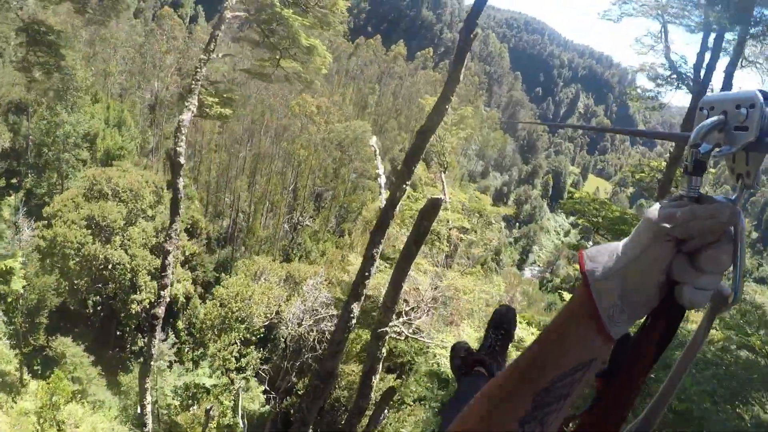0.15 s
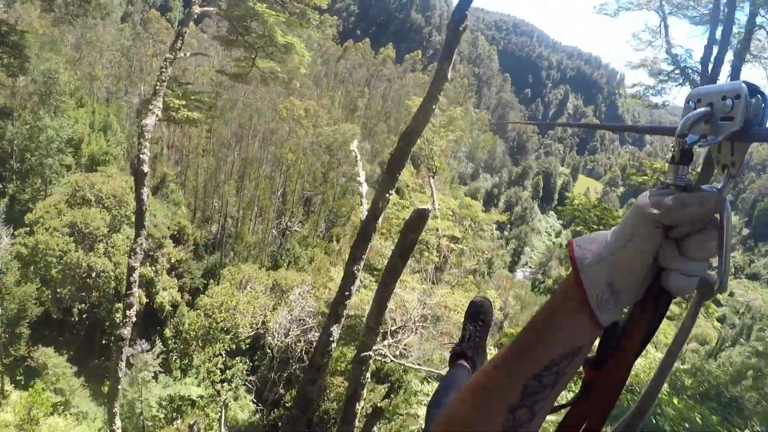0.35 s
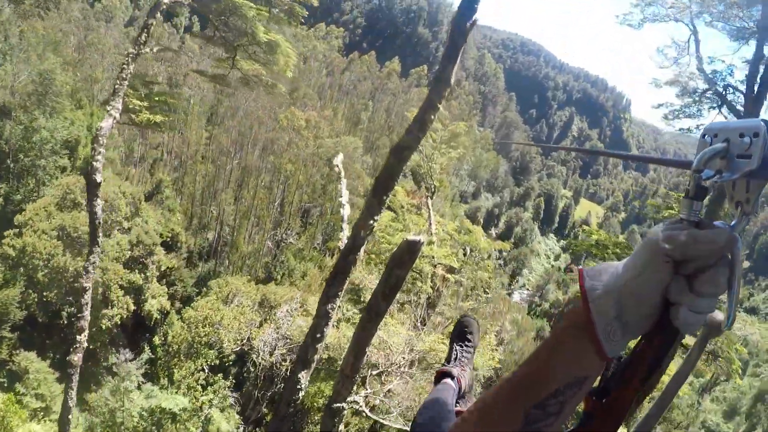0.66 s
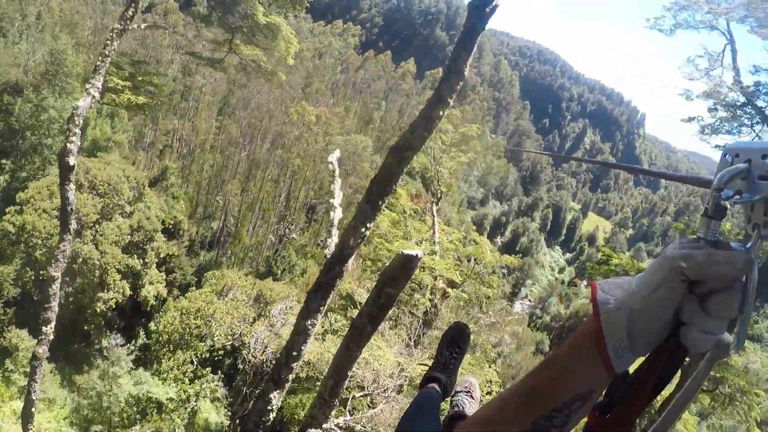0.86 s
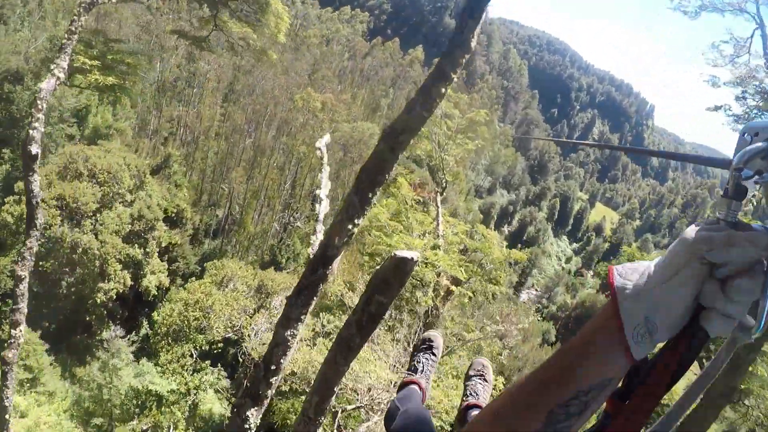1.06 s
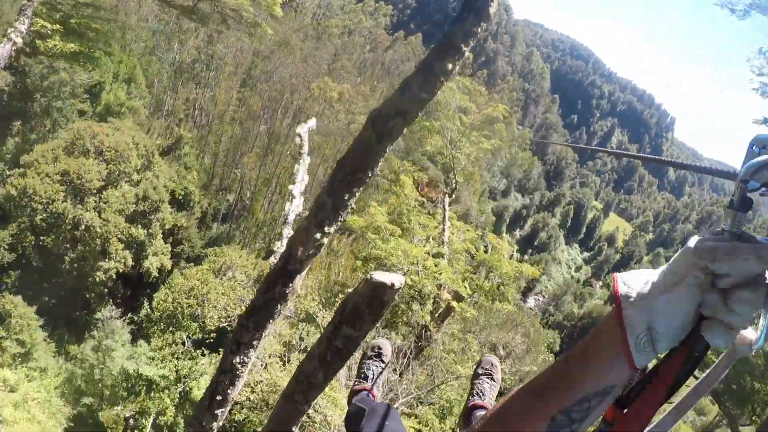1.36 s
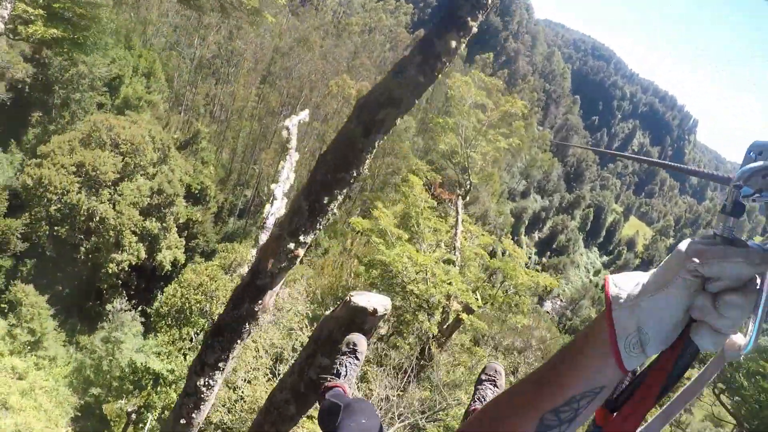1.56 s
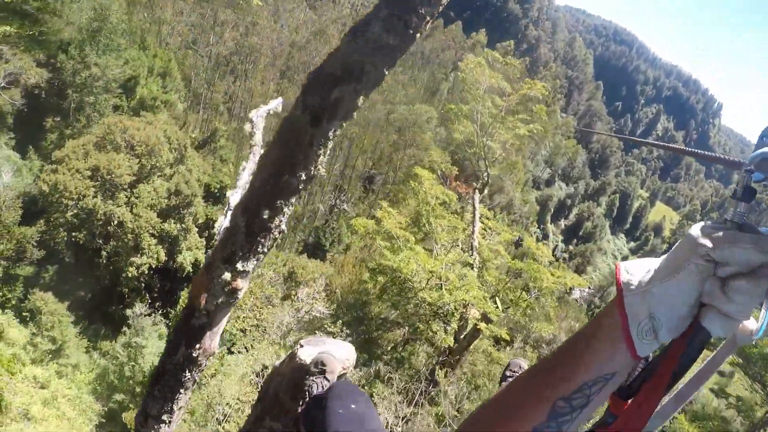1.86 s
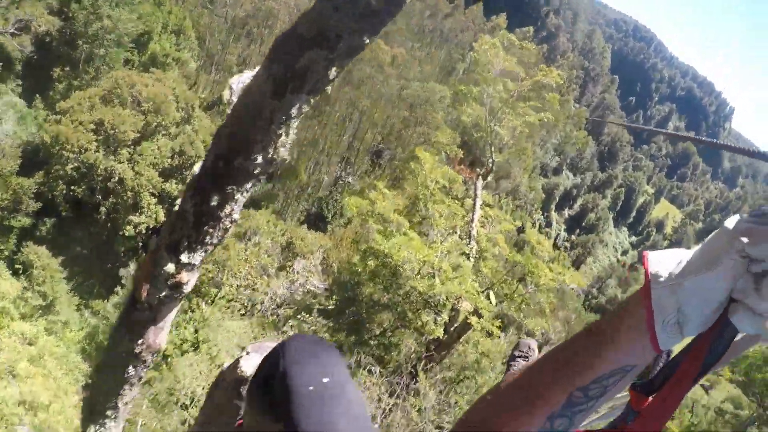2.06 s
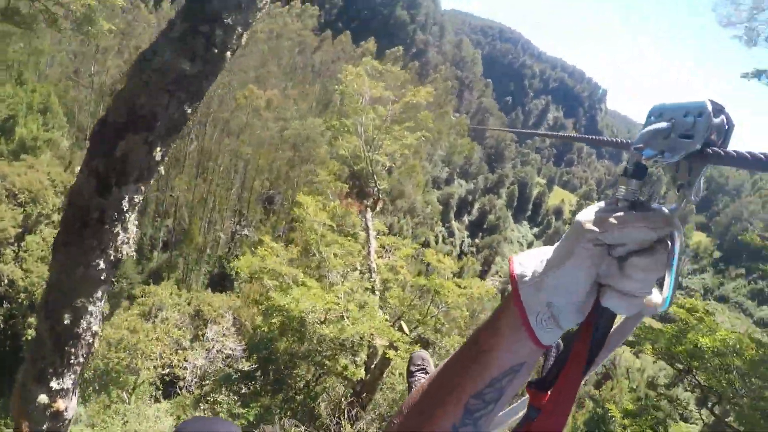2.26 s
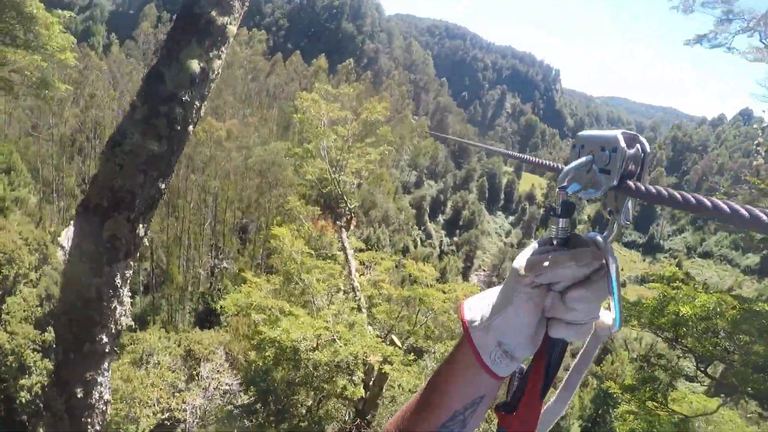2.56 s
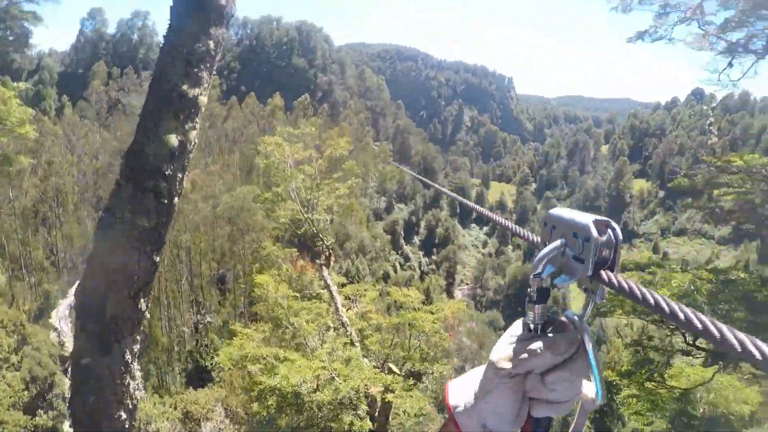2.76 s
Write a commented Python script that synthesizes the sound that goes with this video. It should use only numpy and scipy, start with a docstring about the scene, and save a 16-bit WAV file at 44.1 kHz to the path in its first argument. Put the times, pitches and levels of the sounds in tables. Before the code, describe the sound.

Pulleys rush over a steel cable with a buzzing hiss, stop abruptly, then roll back ticking

```python
"""In a breezy forest, right beside a steel cable: a zipline trolley rolls by a camera with two microphone ports.
Strands tick under its pulleys: filtered noise, a hiss with a buzz at speed; it brakes to a stop and rolls
slowly back with single clicks, then grit at the end. A swept low tone is the shuddering rig, sine bursts the
knocking camera mount. Low-coloured noise makes the wind on the ports, and a steady broad noise the breeze
and far leaves."""
import sys
import numpy as np
from scipy import signal
from scipy.fft import rfft, irfft, next_fast_len
from scipy.io import wavfile
from scipy.ndimage import uniform_filter1d, map_coordinates

SR = 44100
rng = np.random.default_rng(int(sys.argv[2]) if len(sys.argv) > 2 else 0)


def invert_db(x):
    """Field ratio 10**(x/20) for x, a level in decibels (scalar or array-like)."""
    u = np.asarray(x, float) / 20
    return 10 ** u


def waveform_to_disk(signal):
    """Save audio, clipped to [-1, 1], as 16-bit WAV at the path in sys.argv[1]."""
    frames = np.transpose(np.atleast_2d(signal))
    scaled = np.clip(frames, -1, 1) * 32767
    samples = np.round(scaled).astype(np.int16)
    wavfile.write(sys.argv[1], SR, samples)


N = 127890

# Rolling of the trolley: time_s, strands_per_s, level_db (before the trolley's output gain), left_minus_right_db
ROLLING = [(0, 230, -23, -0.5), (.4, 220, -22.5, 1.5), (.8, 220, -22.5, 0), (1.1, 207, -22, 0),
           (1.4, 179, -23.5, -1.5), (1.7, 160, -24, -2), (1.87, 165, -24.5, -3), (1.96, 103, -28, 0),
           (2.04, 80, -36.5, 0), (2.12, 76, -36, -1.5), (2.2, 73, -42, 0.5), (2.3, 37.6, -64.5, 2.5),
           (2.47, 39.1, -65, 1), (2.52, 112.6, -35.5, 0), (2.58, 69, -48, 2), (2.65, 104, -38, -1.5),
           (2.72, 74, -46.5, 1.5), (2.77, 101, -40, 0.5), (2.83, 80, -48, 1.5), (2.9, 87, -45, -5)]
FULL_SPEED = 221  # strands per second
DULL_BELOW_DB, BRIGHT_ABOVE_DB = -45, -33  # rolling levels between which the treble opens
# Single strands clicking under the slow pulleys: start_s, peak_db (nominal, before the output gain)
SLOW_CLICKS = [(1.9615, -11), (1.9724, -11), (2.0098, -19), (2.0231, -23), (2.0363, -15), (2.0482, -12),
               (2.062, -12.5), (2.072, -13), (2.0852, -12), (2.0969, -11.5), (2.1069, -13), (2.12, -11.5),
               (2.1315, -10.5), (2.1448, -12.5), (2.1598, -15.5), (2.1734, -15.5), (2.1889, -21),
               (2.2092, -15), (2.2456, -24.5), (2.2897, -21), (2.3332, -33.5), (2.479, -18), (2.4874, -26),
               (2.508, -23), (2.5124, -25), (2.5261, -17), (2.5584, -19), (2.5932, -21), (2.6035, -18.5),
               (2.6279, -14.5), (2.6354, -17.5), (2.6702, -19.5), (2.7022, -18.5), (2.7533, -13),
               (2.7611, -23), (2.7719, -21), (2.7886, -15), (2.816, -23.5), (2.8487, -25), (2.863, -25),
               (2.8864, -22)]
CLICK_T60_S, CLICK_CREST_DB, SNAP_DB = 0.019, 7.5, 5  # SNAP_DB: sharp front over the click's noise
# Regular strand ticks; DEPTH_DB is over the hiss at full speed, DEEPER_DB is added per halving of speed
STRAND_T60_S, DEPTH_DB, DEEPER_DB = 0.0091, 7.5, 6
JITTER_STRANDS, SCATTER_DB, ALTERNATE_DB = 0.1, 2, 1.5  # ALTERNATE_DB: every other tick up, the rest down
# Irregular fine rattle of the wires at the end
GRIT_START_S, GRIT_PER_S, GRIT_DB, GRIT_SCATTER_DB = 2.8, 220, 2.5, 8
# The trolley's metal as heard at both ports: freq_hz, left_db, right_db
METAL_COLOUR = [(304, -37, -45.5), (523, -18.5, -15.5), (690, -7, -11.5), (904, -51, -6.5),
                (917, -8.5, -3.5), (1232, -2, 5), (1415, -18.5, -6.5), (1640, -4.5, -1.5), (2270, -7.5, -6),
                (2720, -13, -11), (3020, -14, -1.5), (3860, -6.5, 2), (3740, -9.5, -1.5),
                (5060, -8.5, -3.5), (6160, -1, 2), (6600, 3, -1), (7840, -2, -4.5), (8340, -18, -4),
                (8880, -13.5, -19.5), (9670, -10.5, -16.5), (11000, -48, -19), (11560, -19.5, -30),
                (13530, -35.5, -34), (15700, -60, -80)]
# Sharp modes added to that metal: freq_hz, width_hz, boost_db
METAL_MODES = [(935, 35, 5), (1210, 50, 6), (4780, 60, 5), (7537, 45, 4)]
# Sound bending round the camera body: freq_hz, left_lag_rad, likeness_0_to_1
ROUND_CAMERA = [(500, 0.57, 0.9), (663, 2.03, 0.83), (1260, 2.89, 1), (1896, 5.3, 0.12),
                (2406, 10.05, 0.73), (2910, 11.66, 0.38), (3200, 12, 1), (4150, 11.86, 0.79),
                (5350, 14.18, 1), (6620, 13.82, 1), (7880, 14.8, 0.99), (9250, 12.5, 1), (9450, 8.5, 1),
                (10040, 13.4, 0.9)]
# Hollower, duller colour of slow ticks: freq_hz, gain_db
SLOW_COLOUR = [(2600, 3.5), (3700, 2), (5000, -2.5), (7000, -1), (9500, -9)]
FLAT = [(1, 0)]  # no added colour: freq_hz, gain_db
# Strand hum through the rig: multiple_of_strand_rate, level_db (over the rolling level at full speed)
STRAND_HUM = [(.5, -18), (1, -28)]
HUM_GAIN_DB = 25.5  # added per halving of speed
# Low vibration of the rig: time_s, pitch_hz, level_db (both centres of a random waver)
RIG_SHUDDER = [(0, 70.7, -37.5), (.3, 63.35, -44), (.7, 63.2, -23.5), (.82, 59.3, -34.5),
               (1.1, 54.95, -29.5), (1.35, 55.2, -23), (1.5, 56.31, -29.5), (1.8, 49.8, -25),
               (1.92, 62.2, -28.5), (2.02, 81.67, -22.5), (2.13, 79.4, -31), (2.21, 56.96, -13),
               (2.29, 51.8, -25), (2.36, 54.84, -29), (2.9, 64.2, -34.5)]
# Wind on the ports: time_s, level_db
WIND_LEVEL = [(0, -28.5), (.35, -26.5), (.6, -32.5), (1.15, -22.5), (1.5, -27.5), (1.85, -21.5),
              (1.98, -14), (2.12, -22.5), (2.3, -24.5), (2.45, -27.5), (2.62, -24.5), (2.75, -37),
              (2.9, -19.5)]
# Spectrum of the wind rumble: freq_hz, relative_db
RUMBLE_COLOUR = [(5, -36), (12, 6.5), (22, -4.5), (38, -9.5), (90, -11.5), (140, -29.5), (300, -63.5)]
# How alike the rumble is at the two ports: freq_hz, likeness_0_to_1
RUMBLE_LIKENESS = [(60, 0.89), (130, 0.46)]
# Wind slaps, stronger at one port or the other: start_s, peak_db (nominal), left_minus_right_db
WIND_SLAPS = [(0.124, -35, -8), (0.697, -31.5, -7), (1.036, -28, -0.5), (1.251, -26, -9), (1.679, -29, 1)]
# Spectrum of a slap: freq_hz, relative_db
SLAP_COLOUR = [(60, -9), (130, 5.5), (250, -3), (450, -14), (900, -47)]
SLAP_LIKENESS = [(100, 0.5), (300, -0.37)]  # freq_hz, likeness (negative is opposite)
SLAP_S, SLAP_CREST_DB = 0.013, 0.5  # SLAP_S: delay to the peak, and spread of the bell
# Knocks of the camera mount: start_s, ring_db, thud_db (before the mode levels), left_minus_right_db
MOUNT_KNOCKS = [(1.986, -32, -26, 12), (2.042, -10, -27.5, 4), (2.126, -19, -15.5, 8.5),
                (2.442, -38, -29, 9), (2.531, -13, -13.5, 4.5)]
# Ringing modes of the camera mount: freq_hz, level_db, t60_s
MOUNT_MODES = [(640, 3, 0.011), (954, 1, 0.02), (1560, -7, 0.024), (2230, -7, 0.012)]
# Dull modes of the camera body: freq_hz, level_db, t60_s
BODY_MODES = [(163, 1.5, 0.041), (227, 1, 0.049), (363, -3.5, 0.03)]
RING_RISE_S, THUD_RISE_S = 0.00052, 0.0049
# Forest air and leaves: freq_hz, relative_db
FOREST_COLOUR = [(60, 2.5), (120, 2), (230, 0.5), (330, -4.5), (700, -10), (2600, -19.5), (6600, -29),
                 (10000, -40), (13000, -56)]
FOREST_LIKENESS = [(120, 0.8), (300, 0.079), (6000, 0.39)]  # freq_hz, likeness_0_to_1
FOREST_DB = -41
CEILING = 0.9  # of the microphone amplifier, in full scale


def unit(x):
    """Scale to rms 1."""
    return x / np.sqrt(np.mean(x ** 2) + 1e-20)


def along(points, hz):
    """Read each column after the frequency, on a log frequency axis."""
    f, *columns = np.transpose(points)
    return np.array([np.interp(np.log(hz + 1), np.log(f + 1), column) for column in columns])


def curves(rows):
    """Give one value per sample for each column after the time."""
    s, *columns = np.transpose(rows)
    return [np.interp(np.arange(N) / SR, s, column) for column in columns]


def wobble(rate):
    """A smooth random curve with rate knots a second."""
    return map_coordinates(rng.standard_normal(N // 100), [np.arange(N) * rate / SR])


def noise_pair():
    """Unrelated white noise for the two ports."""
    return rng.standard_normal((2, N))


def coloured(pair, left_db, right_db, lag, alike):
    """Turn two unrelated excitations into a partly alike, coloured stereo pair; settings are functions of Hz."""
    m = 2 * next_fast_len(N // 2 + SR // 8)
    hz = np.fft.rfftfreq(m, 1 / SR)
    # Folding the cepstrum gives a minimum-phase colour: nothing sounds ahead of its cause
    cepstrum = irfft(np.log(invert_db(right_db(hz)) + 1e-6), m)
    fold = np.r_[1, 2 * np.ones(m // 2 - 1), 1, np.zeros(m // 2 - 1)]
    right_colour = np.exp(rfft(cepstrum * fold))
    a, b = rfft(pair, m)
    c = np.clip(alike(hz), -1, 1)
    mixed = c * a + np.sqrt(1 - c * c) * b
    left = mixed * invert_db(left_db(hz) - right_db(hz)) * np.exp(-1j * lag(hz))
    return irfft(np.array([left, a]) * right_colour, m)[:, :N]


def plain(pair, spectrum, alike):
    """Colour both ports the same, without lag."""
    def db(hz):
        return along(spectrum, hz)[0]
    return coloured(pair, db, db, lambda hz: 0 * hz, lambda hz: along(alike, hz)[0])


def bursts(at_s, db, t60):
    """An envelope that jumps at each time and dies away by 60 dB in t60 seconds."""
    samples = np.clip(np.round(at_s * SR).astype(int), 0, N - 1)
    kicks = np.bincount(samples, invert_db(db), N)
    return signal.lfilter([1], [1, -invert_db(-60 / (t60 * SR))], kicks)


def pan(db):
    """Left and right gains for a left-minus-right difference."""
    return invert_db(np.array([db / 2, -db / 2]))


def patchy(x, patchy_db):
    """Random slow gain patches over frequency and time, shared by both ports."""
    z = signal.stft(x, nperseg=256)[2]
    field = uniform_filter1d(rng.standard_normal(z.shape[1:]), size=9, axis=0)
    field = uniform_filter1d(field, size=4, axis=1)
    return signal.istft(z * invert_db(patchy_db * unit(field)), nperseg=256)[1][:, :N]


def strand_ticks(turns, slower):
    """Each strand passing at speed gives a decaying tick, up to the first slow click."""
    count = int(turns[round(SLOW_CLICKS[0][0] * SR)])
    jitter, scatter = rng.standard_normal((2, count))
    k = np.arange(count)
    at = np.searchsorted(turns, k + JITTER_STRANDS * jitter).clip(0, N - 1)
    db = DEPTH_DB + DEEPER_DB * slower[at]
    db = db + SCATTER_DB * np.tanh(scatter) + ALTERNATE_DB * (-1.) ** k
    return bursts(at / SR, db, STRAND_T60_S)


def wire_grit():
    """Wires rattle finely at random intervals at the end of the slow roll back."""
    at_s = GRIT_START_S + np.cumsum(rng.exponential(size=N // 100)) / GRIT_PER_S
    db = GRIT_DB + GRIT_SCATTER_DB * np.tanh(rng.standard_normal(N // 100))
    heard = at_s < N / SR
    return bursts(at_s[heard], db[heard], STRAND_T60_S)


def slow_clicks():
    """Single strands slip under the slow pulleys: a noise burst with a sharp front."""
    s, peak_db = np.transpose(SLOW_CLICKS)
    db = peak_db - CLICK_CREST_DB
    snaps = np.bincount(np.round(s * SR).astype(int), invert_db(db + SNAP_DB), N)
    return bursts(s, db, CLICK_T60_S) * noise_pair() + snaps


def through_metal(pair, extra):
    """The trolley's metal resonates and its sound bends round the camera body to the far port."""
    def shared_db(hz):
        modes = sum(db / (1 + (2 * (hz - mode_hz) / width) ** 2) for mode_hz, width, db in METAL_MODES)
        return modes + along(extra, hz)[0]
    return coloured(pair,
                    lambda hz: along(METAL_COLOUR, hz)[0] + shared_db(hz),
                    lambda hz: along(METAL_COLOUR, hz)[1] + shared_db(hz),
                    lambda hz: along(ROUND_CAMERA, hz)[0],
                    lambda hz: along(ROUND_CAMERA, hz)[1])


def strand_hum(turns, level_db, slower):
    """The rig hums at multiples of the strand rate, with a gain that grows as the trolley slows."""
    hum = np.zeros(N)
    for times, db in STRAND_HUM:
        gain = invert_db(level_db + db + HUM_GAIN_DB * slower + 2.5 * wobble(9.35))
        hum += gain * np.sin(2 * np.pi * times * turns)
    return hum


def trolley():
    """Strand contacts modulate a rolling hiss; hiss and slow clicks ring through the same metal, over a hum."""
    rate, level_db, side_db = curves(ROLLING)
    slower = np.log2(FULL_SPEED / rate)  # halvings of speed
    turns = np.cumsum(rate) / SR  # strands passed so far
    contact = np.sqrt(1 + strand_ticks(turns, slower) ** 2 + wire_grit() ** 2)
    # Level the running power so that the ticks and grit do not change the loudness
    contact = contact / np.sqrt(np.abs(uniform_filter1d(contact ** 2, size=2500)))
    roll = contact * invert_db(level_db + 0.13 * wobble(7.58))
    noise = noise_pair()
    drive = patchy(roll * noise, patchy_db=1.18) + slow_clicks()
    fast = np.clip((level_db - DULL_BELOW_DB) / (BRIGHT_ABOVE_DB - DULL_BELOW_DB), 0, 1)
    hiss = through_metal(fast * drive, FLAT) + through_metal((1 - fast) * drive, SLOW_COLOUR)
    hiss = hiss / np.std(through_metal(noise, FLAT))
    return hiss * invert_db(4.0) * pan(side_db) + strand_hum(turns, level_db, slower)


def shudder():
    """The loaded rig vibrates low, a sine wavering in pitch and strength."""
    pitch_hz, level_db = curves(RIG_SHUDDER)
    phase = 2 * np.pi * np.cumsum(pitch_hz * (1 + 0.075 * wobble(12))) / SR
    gain = np.sqrt(2) * invert_db(level_db + 1.1 * wobble(18))  # root 2: level is rms
    return gain * np.sin(phase) * pan(1.6)[:, None]


def wind_slaps():
    """Wind slaps the ports: low noise of even power under short bells."""
    t = np.arange(N) / SR
    swell = np.zeros((2, N))
    for s, db, side_db in WIND_SLAPS:
        bell = np.exp(-.5 * ((t - s - SLAP_S) / SLAP_S) ** 2)
        swell += invert_db(db - SLAP_CREST_DB) * pan(side_db)[:, None] * bell
    puff = plain(noise_pair(), SLAP_COLOUR, SLAP_LIKENESS)
    return swell * puff / np.sqrt(np.abs(uniform_filter1d(puff ** 2, size=900, axis=1)))


def wind():
    """Air rumbles at the microphone ports as lumpy low noise, with slaps."""
    level_db, = curves(WIND_LEVEL)
    lumpy = noise_pair() * invert_db(1.5 * wobble(9.95))
    rumble = unit(plain(lumpy, RUMBLE_COLOUR, RUMBLE_LIKENESS)) * invert_db(level_db)
    return rumble + wind_slaps()


def ringing(modes, knock_db, rise_s):
    """Sum decaying sines, their strengths varying from knock to knock, under a soft rise."""
    t = np.arange(SR // 10) / SR
    out = np.zeros(len(t))
    for hz, level_db, t60 in modes:
        db = knock_db + level_db + rng.normal(0, 2.25)
        out += invert_db(db - 60 * t / t60) * np.sin(2 * np.pi * hz * t)
    return out * (1 - np.exp(-t / rise_s))


def knocks():
    """The mount rings briefly, opposite at the two ports, over a dull thud of the camera body."""
    out = np.zeros((2, N + SR))
    for s, ring_db, thud_db, side_db in MOUNT_KNOCKS:
        ring = ringing(MOUNT_MODES, ring_db, RING_RISE_S)
        thud = ringing(BODY_MODES, thud_db, THUD_RISE_S)
        start = round(s * SR)
        out[:, start:start + len(ring)] += pan(side_db)[:, None] * (np.array([[1], [-1]]) * ring + thud)
    return out[:, :N]


def forest():
    """A steady breeze: soft low air at the ports and far leaves, as coloured noise."""
    return invert_db(FOREST_DB) * unit(plain(noise_pair(), FOREST_COLOUR, FOREST_LIKENESS))


def scene():
    """Add up the trolley, the rig, the wind, the mount and the forest."""
    return trolley() + shudder() + wind() + knocks() + forest()


def roll_off(x):
    """The treble ends steeply here."""
    return signal.sosfilt(signal.butter(12, 15250, fs=SR, output="sos"), x)


def record(dry):
    """The microphone amplifier rounds off the highest peaks."""
    mix = CEILING * np.tanh(dry / CEILING)
    return roll_off(mix)


dry = scene()
out = record(dry)
waveform_to_disk(out)
```